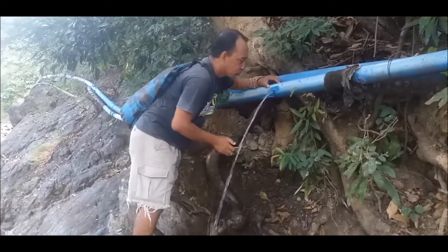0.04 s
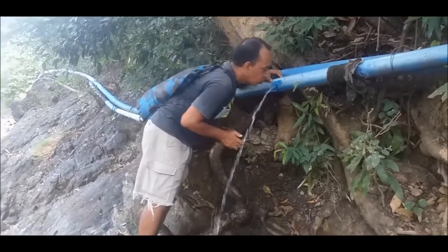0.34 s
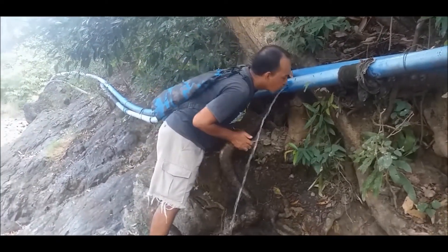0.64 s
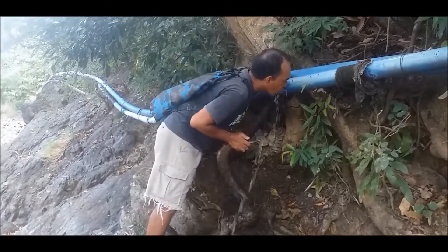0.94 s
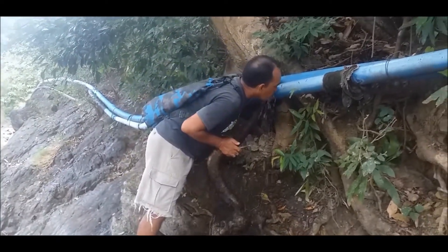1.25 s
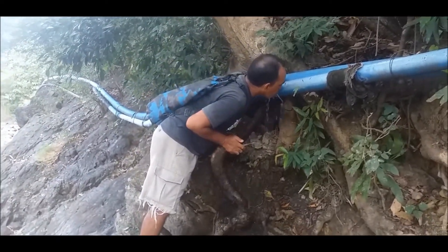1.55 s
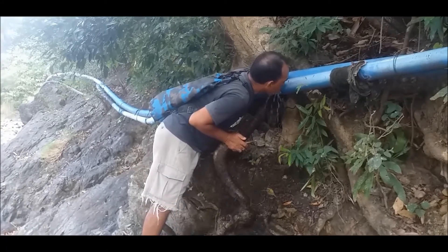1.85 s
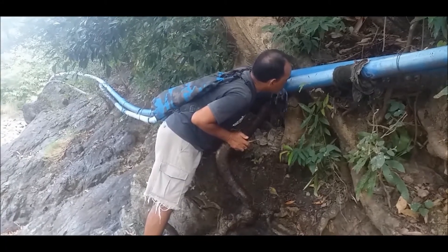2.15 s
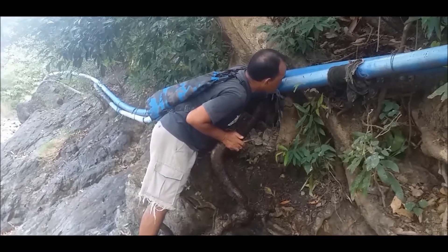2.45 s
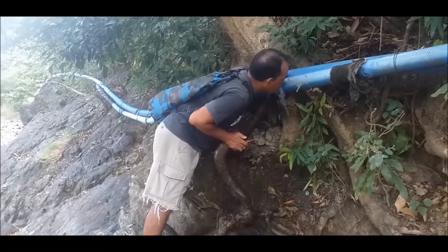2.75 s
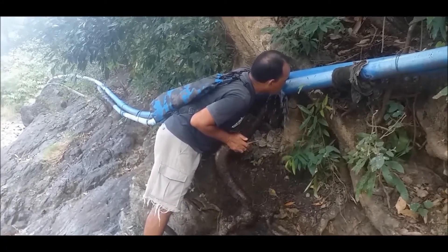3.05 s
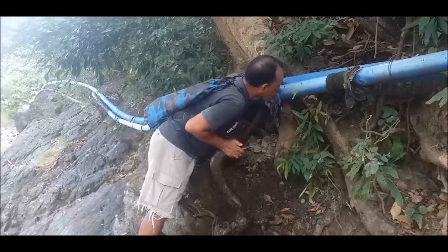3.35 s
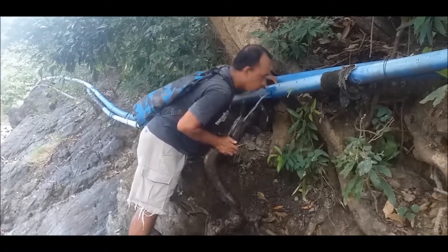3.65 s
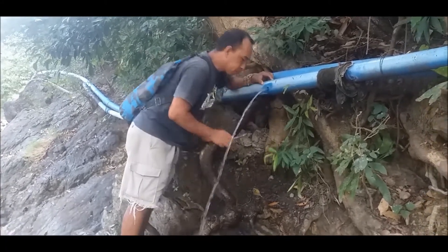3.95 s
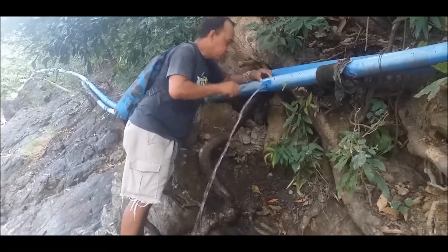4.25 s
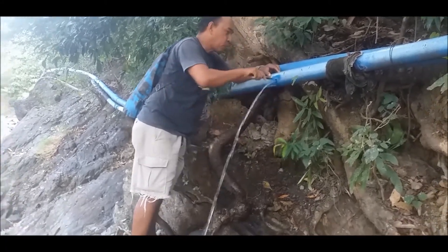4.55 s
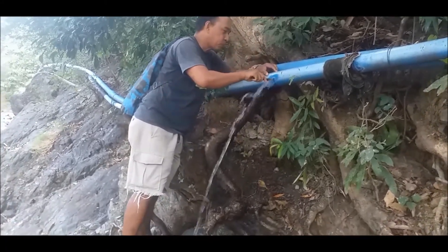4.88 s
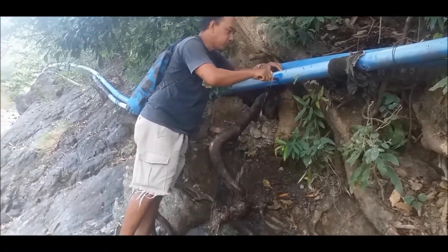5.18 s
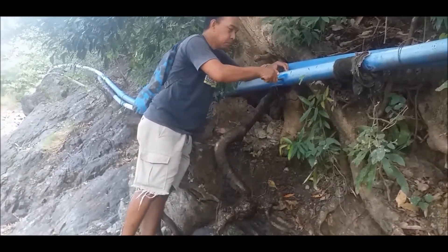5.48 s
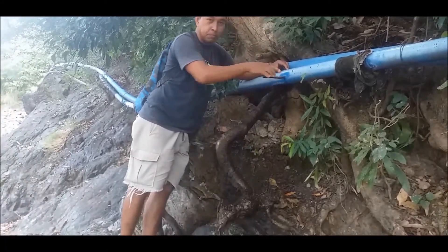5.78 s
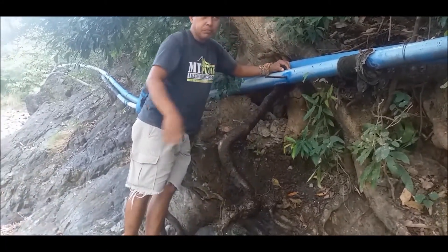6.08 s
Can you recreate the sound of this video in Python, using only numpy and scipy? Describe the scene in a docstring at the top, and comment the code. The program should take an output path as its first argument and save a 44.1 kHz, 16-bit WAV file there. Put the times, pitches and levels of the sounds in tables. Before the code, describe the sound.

Outdoors, close to the microphone, a narrow stream from a leaking pipe patters and sizzles on stone and slaps into mud, with a soft puddle burble. The flow soon falls to quiet dribbling and separate drips for about three seconds, abruptly splashes freely again, and then tails off. Three brief, high, rising bird whistles sound softly, spaced well apart, above faint steady background noise.

```python
"""Beside an earth bank, a thin jet arcs from a hole in a plastic pipe and spatters on rock and soil.
For three seconds it is caught for a drink and only dribbles; then it splashes freely until a hand
stops the hole. Each impact is an impulse followed by a rush of fragments, and air driven into the
puddle rings as bubbles. Fat drops smack close by, a small bird whistles three rising calls, and faint
outdoor noise lies underneath."""
import sys
import numpy as np
from scipy import signal
from scipy.fft import rfft, irfft, next_fast_len
from scipy.io import wavfile
from scipy.ndimage import uniform_filter1d

SR = 44100
rng = np.random.default_rng(int(sys.argv[2]) if len(sys.argv) > 2 else 0)


def master(y):
    """Save y as 16-bit WAV."""
    cut = np.clip(np.atleast_2d(y).T, -1, 1)
    pcm = np.round(cut * 32767)  # scale
    wavfile.write(sys.argv[1], SR, pcm.astype(np.int16))


N = 274302
TIME = np.arange(N) / SR

# Filter curves that colour each source. Each row: frequency in Hz, relative gain in dB.
HUSH_SPECTRUM = [(20, -14), (45, -13.5), (65, -2.5), (100, 1), (150, -2), (230, -11.5), (500, -12),
                 (1200, -14), (1800, -11.5), (3000, -3), (7000, -3), (10000, -16), (16000, -26)]
PUDDLE_SPECTRUM = [(100, -25.5), (200, -8), (350, -3.5), (600, -3.5), (760, 0), (930, -2), (1100, 1),
                   (1280, 3), (1600, -4.5), (2600, -19.5)]
MUD_SPECTRUM = [(600, -19.5), (790, -18.5), (930, -5.5), (1150, -17), (1750, -2.5), (2150, -3.5),
                (2600, -3), (3200, -6.5), (4200, -3), (8000, -37)]
BEAD_SPECTRUM = [(700, -36), (2000, -8.5), (3800, -15), (7500, -8.5), (10000, -5), (15500, -1.5)]
PATTER_SPECTRUM = [(800, -41), (2100, -13.5), (3200, -2.5), (4500, 3), (7500, 4.5), (10000, -12),
                   (16000, -24)]
SPRAY_SPECTRUM = [(1000, -19.5), (2500, -18.5), (4500, -7.5), (8000, 1), (11000, 0), (15500, 1.5)]
# The bird's calls. Each row: start in seconds, base level in dB, pitch as a ratio to the contour.
CALLS = [(1.208, -60, .99), (3.632, -58.5, 1.02), (5.382, -59.5, 1.04)]
# The contour of one call. Each row: time into the call in seconds, pitch in Hz, relative level in dB.
CALL_CONTOUR = [(0, 4900, -12), (0.028, 4550, -6), (0.049, 4580, 4), (0.07, 4850, -0.5), (.085, 5400, 5),
                (.096, 6100, 2.5), (.118, 6040, 3), (.135, 6200, -22)]
# Single large bubbles. Each row: start in seconds, starting pitch in Hz, peak level in dB.
LARGE_BUBBLES = [(1.458, 1530, -55.5), (2.316, 1167, -66.5), (2.507, 1690, -62), (2.626, 1010, -66),
                 (3.115, 1160, -67)]
# Heavy slugs of water flopping into soil. Each row: time of the peak in seconds, level in dB.
SOIL_SLUGS = [(0.19, -55), (0.565, -50.5), (0.869, -52), (1.02, -52), (4.071, -48), (4.49, -55),
              (4.658, -58), (4.901, -51.5), (5.209, -50.5)]
# The landing jet. Each row: time in seconds, flow as a spray level in dB, level on wet soil in dB.
JET_FLOW = [(0.0, -52, -58), (0.28, -55, -58), (0.42, -50.5, -61), (0.68, -53.5, -62), (0.93, -48, -62.5),
            (1.11, -49, -62.5), (1.24, -60, -68.5), (1.72, -62.5, -65.5), (1.88, -67, -76.5),
            (2.05, -61, -79.5), (2.4, -64.5, -82), (2.55, -63.5, -73), (2.78, -62.5, -74.5),
            (3.05, -65.5, -99), (3.25, -60.5, -75), (3.5, -66.5, -93), (4.02, -63, -83), (4.06, -50, -57),
            (4.26, -54.5, -67), (5.0, -51.5, -62.5), (5.11, -55.5, -70), (5.19, -50, -62.5),
            (5.29, -50, -62.5), (5.39, -62.5, -69.5), (5.56, -70.5, -76), (5.85, -68.5, -66.5),
            (5.95, -79.5, -74.5), (6.22, -78.5, -78)]
# The fattest drops. Each row: start in seconds, smack level in dB (its energy spread over 5 ms),
# pitch in Hz, nominal low edge in Hz, level of the crack relative to the smack in dB.
FAT_DROPS = [(0.0171, -35, 5500, 3130, -26), (0.0444, -33.5, 4170, 1880, -17),
             (0.0538, -36, 5900, 3500, 0.5), (0.3024, -44, 1530, 1190, -10), (0.343, -30, 5730, 4180, -33),
             (0.43, -32.5, 6000, 2750, -7), (0.4432, -37, 6000, 4630, 2), (0.4518, -34.5, 4830, 3930, -18),
             (0.6546, -36, 7850, 6600, 1.5), (0.696, -47, 4250, 3300, -6), (0.702, -32.5, 2800, 1670, -4),
             (0.7616, -32, 7700, 4200, -1), (0.7793, -37, 4870, 4000, 4), (0.8457, -38.5, 6600, 5000, -32),
             (0.8576, -37.5, 4970, 2080, -3), (0.868, -40.5, 4220, 3340, -6),
             (0.8893, -38, 5940, 1900, -19), (0.935, -34, 2960, 2180, -18), (0.9402, -30, 7400, 3840, -18),
             (0.9533, -34.5, 3000, 2270, -16), (0.9708, -34, 3140, 2550, -28),
             (0.99, -26.5, 5200, 2100, -2), (1.032, -31.5, 6200, 4440, -12),
             (1.0453, -36.5, 5070, 2410, -19), (1.1096, -40.5, 3100, 2550, -21),
             (1.296, -48, 6700, 4600, 5), (1.4276, -49.5, 4870, 3800, -13), (2.1451, -58, 7490, 3600, 11),
             (2.2342, -50, 4680, 3320, -21), (2.497, -40, 5170, 3670, -34),
             (2.5236, -47.5, 4500, 3720, -13), (2.7594, -37.5, 7300, 3360, -29),
             (2.9159, -48, 7360, 5100, -6), (2.9966, -45.5, 7250, 5160, -20),
             (3.1392, -53.5, 4800, 3500, 0), (3.1742, -46.5, 7540, 4220, 3.5),
             (3.1842, -44.5, 3520, 3040, -5), (3.3636, -47.5, 7460, 4440, -20),
             (3.597, -46.5, 7840, 4030, -30), (3.6386, -44.5, 6100, 3300, -15),
             (3.6684, -46.5, 7150, 5100, 1), (3.724, -47, 3250, 2770, -6), (3.8881, -39.5, 6500, 3080, -5),
             (3.9971, -38.5, 6750, 3520, -34), (4.0245, -49, 6460, 5100, 4), (4.039, -43, 5170, 4000, 1.5),
             (4.0495, -39.5, 4600, 3300, -4), (4.0576, -40, 5250, 3800, 1), (4.0733, -36, 3070, 2470, -4),
             (4.0952, -37, 4260, 2210, -8), (4.166, -45.5, 2850, 2230, -5), (4.2277, -40, 4220, 3040, -9),
             (4.451, -44.5, 5250, 2930, -0.5), (4.486, -47, 1770, 1440, -8), (4.5241, -41, 4400, 3560, -3),
             (4.6601, -43.5, 6100, 2830, -2), (4.7462, -39, 5530, 3380, -15), (4.972, -44, 4520, 2330, -7),
             (4.984, -42, 4300, 2270, -2), (5.037, -42, 3330, 2740, -1), (5.1588, -38, 6440, 3400, -20),
             (5.1784, -39, 6740, 4030, 2), (5.327, -41.5, 5500, 4630, -4), (5.364, -45, 5100, 2320, -21),
             (5.4208, -46.5, 7450, 5100, 3.5), (5.616, -53, 4830, 3750, -7)]

FULL_FLOW_DB, FULL_SOIL_DB = -52, -61   # reference levels of the free-running jet


def from_db(db):
    """Convert decibels to an amplitude ratio."""
    return 10 ** (np.asarray(db) / 20)


def unit_rms(x):
    """Normalise to unit mean power."""
    return x / np.sqrt(np.mean(x ** 2) + 1e-20)


def add(out, start_s, sound):
    """Superpose a short sound at its start time."""
    start = max(0, round(start_s * SR))
    out[start:start + len(sound)] += sound[:max(0, N - start)]


def drift(rate_hz):
    """Low-passed noise gives a smooth random fluctuation of unit rms."""
    step, warm_up = 40, 2000
    pole = np.exp(-2 * np.pi * step * rate_hz / SR)
    noise = rng.standard_normal(N // step + warm_up + 2)
    slow = signal.lfilter([1], [1, -2 * pole, pole * pole], noise)[warm_up:]
    return np.interp(np.arange(N) / step, np.arange(len(slow)), unit_rms(slow))


def colour(x, spectrum):
    """A minimum-phase filter shapes the spectrum causally; the result has unit rms."""
    size = 2 * next_fast_len(N // 2 + SR // 10)
    hz, db = np.transpose(spectrum)
    grid_hz = np.maximum(np.arange(size // 2 + 1) * SR / size, 1)
    gain = from_db(np.interp(np.log(grid_hz), np.log(hz), db))
    cepstrum = irfft(np.log(gain))
    response = np.exp(rfft(2 * cepstrum[:size // 2], size))
    return unit_rms(irfft(rfft(x, size) * response)[:N])


def resonance(x, hz, width_hz):
    """A damped two-pole resonator with unit gain at its peak."""
    r = np.exp(-np.pi * width_hz / SR)
    feedback = [1, -2 * r * np.cos(2 * np.pi * hz / SR), r * r]
    return signal.lfilter(np.array([1, 0, -1]) * (1 - r * r) / 2, feedback, x + 1e-18)


def fragments(clicks, t60):
    """Splash fragments follow each click as exponentially decaying noise of equal energy."""
    decay = 10 ** (-6 / (t60 * SR))
    power = signal.lfilter([1 - decay], [1, -decay], clicks ** 2 + 1e-18)
    return np.sqrt(power) * rng.standard_normal(len(clicks))


def impacts(per_s, spread_db, band_hz, q, splash_t60, shatter, pitches):
    """Shot noise: random impacts and their fragments excite resonators; the power is held even."""
    struck = rng.random(N) < per_s / SR
    sizes = from_db(spread_db * np.minimum(rng.exponential(1, N), 3.5))
    clicks = struck * sizes * rng.choice([-1, 1], N)
    pitch_index, out = rng.integers(0, pitches, N), np.zeros(N)
    for k, hz in enumerate(np.geomspace(*band_hz, pitches)):
        own = clicks * (pitch_index == k)
        out += resonance(own + shatter * fragments(own, splash_t60), hz, hz / q)
    return out / np.sqrt(uniform_filter1d(out ** 2, SR // 8) + 1e-12)


def outdoor_hush(level_db):
    """Ambient noise is stationary: a random signal with a fixed spectrum."""
    return from_db(level_db) * colour(rng.standard_normal(N), HUSH_SPECTRUM)


def scatter(x, t60, dull_hz):
    """Diffuse reflection from bank, rocks and leaves: convolution with a dull tail of unit energy."""
    t = np.arange(SR // 2) / SR
    tail = rng.standard_normal(len(t)) * from_db(-60 * t / t60) * (t > 0.002)
    tail = signal.sosfilt(signal.butter(1, dull_hz, fs=SR, output="sos"), tail)
    return signal.oaconvolve(x, tail / np.linalg.norm(tail))[:N]


def bird():
    """A whistle is a frequency-modulated tone: it sweeps up and holds, with a slight tremble."""
    out = np.zeros(N)
    times, contour_hz, contour_db = np.transpose(CALL_CONTOUR)
    t = np.arange(int(times[-1] * SR)) / SR
    for start, db, ratio in CALLS:
        tremble = 1 + 0.016 * drift(140)[:len(t)]
        hz = ratio * np.interp(t, times, contour_hz) * tremble
        envelope = from_db(db + np.interp(t, times, contour_db))
        add(out, start, envelope * np.sin(2 * np.pi * np.cumsum(hz) / SR))
    return out


def large_bubbles(t60, rise_per_s):
    """A bubble is a damped oscillator whose pitch climbs as it nears the surface."""
    out, t = np.zeros(N), np.arange(SR // 10) / SR
    for start, hz, db in LARGE_BUBBLES:
        phase = 2 * np.pi * hz * t * (1 + rise_per_s * t / 2)
        add(out, start, from_db(db - 60 * t / t60) * np.sin(phase))
    return out


def puddle(soil_db, lumps, full_flow_db=-69.43):
    """Air entrainment: water drives small bubbles into the puddle, each ringing for a few cycles."""
    bubbles = impacts(per_s=1300, spread_db=1, band_hz=(199, 1900), q=6.1,
                      splash_t60=0.048, shatter=0.99, pitches=16)
    level_db = full_flow_db + 0.58 * (soil_db - FULL_SOIL_DB) + 1.3 * lumps
    return from_db(level_db) * colour(bubbles, PUDDLE_SPECTRUM)


def with_slugs(soil_db, attack_s=0.017, t60=0.29):
    """Incoherent powers add: the level in dB of the fall on soil plus slugs that swell and drain."""
    power = from_db(soil_db) ** 2
    for peak_s, db in SOIL_SLUGS:
        swell = np.clip(1 + (TIME - peak_s) / attack_s, 0, 1)
        drain = from_db(db - 60 * np.clip(TIME - peak_s, 0, 1) / t60)
        power += (swell * drain) ** 2
    return 10 * np.log10(power)


def mud(level_db, lumps):
    """Damped impacts: the heavier parts of the stream slap into wet soil."""
    slaps = impacts(per_s=750, spread_db=4, band_hz=(900, 4000), q=4.5,
                    splash_t60=0.02, shatter=1.4, pitches=11)
    return from_db(level_db - 0.1 + 1.5 * lumps) * colour(slaps, MUD_SPECTRUM)


def beads(swing_db, full_flow_per_s=44, spread_db=5.5, rms_db=-57):
    """Jet break-up: beads strike bare rock, and such brief contacts give crisp broadband ticks."""
    per_s = full_flow_per_s * from_db(0.5 * swing_db)
    struck = rng.random(N) < per_s / SR
    clicks = struck * from_db(spread_db * rng.uniform(-1, 1, N))
    ticks = 0.5 * clicks + fragments(clicks, t60=0.005)
    return from_db(rms_db) * colour(ticks * from_db(1.26 * swing_db), BEAD_SPECTRUM)


def spray(flow_db, lumps):
    """Tiny droplets thrown off by the impact land so densely that their shot noise fuses to a sizzle."""
    sizzle = impacts(per_s=5100, spread_db=1, band_hz=(3500, 15100), q=0.66,
                     splash_t60=0.022, shatter=0.72, pitches=4)
    return from_db(flow_db + 0.6 + 2.6 * lumps) * colour(sizzle, SPRAY_SPECTRUM)


def patter(swing_db, lumps, full_flow_per_s=1381, full_flow_db=-50.9):
    """Small drops tick on wet rock as a Poisson process whose rate and level rise with the flow."""
    per_s = full_flow_per_s * from_db(0.5 * swing_db)
    ticks = impacts(per_s, spread_db=4.2, band_hz=(2800, 8700), q=2.6,
                    splash_t60=0.013, shatter=1.8, pitches=8)
    return from_db(full_flow_db + swing_db + 1.2 * lumps) * colour(ticks, PATTER_SPECTRUM)


def fat_drops(flatten_s=0.0007, relative_width=0.067):
    """Impulse excitation: each drop gives a pitched smack, a hollow crater plop and, if hard, a crack."""
    out, click = np.zeros(N), signal.unit_impulse(SR // 20)
    flattening = 1 - np.exp(-np.arange(len(click)) / (flatten_s * SR))
    to_5_ms = np.sqrt(0.005 * SR / len(click))   # unit rms becomes the energy of 5 ms at unit rms
    crack_band = signal.butter(2, 9000, "high", fs=SR, output="sos")
    plop_band = signal.butter(4, 810, "high", fs=SR, output="sos")
    for start, db, hz, low_hz, crack_db in FAT_DROPS:
        hit = 1.2 * click + 5.4 * flattening * fragments(click, t60=0.008)   # contact, then splash
        edge_hz = np.clip(0.91 * low_hz, 300, 7000)
        smack_band = signal.butter(3, [edge_hz, 8200], "band", fs=SR, output="sos")
        ring = resonance(hit, hz, relative_width * hz)
        smack = unit_rms(signal.sosfilt(smack_band, ring + 0.5 * hit))
        crater = resonance(resonance(hit, hz=914, width_hz=240), hz=1160, width_hz=820)
        plop = unit_rms(signal.sosfilt(plop_band, crater))
        plop_gain = from_db(-21) * min(1900 / low_hz, 1.5) ** 2   # deep, heavy drops plop more
        crack = unit_rms(signal.sosfilt(crack_band, hit + 3.1 * click))
        drop = smack + plop_gain * plop + from_db(crack_db) * crack
        add(out, start, from_db(db) * to_5_ms * drop)
    return out


def scene():
    """Superposition of the water, its reflections, a bird in the trees and the outdoor hush."""
    times, flow_points, soil_points = np.transpose(JET_FLOW)
    flow_db = np.interp(TIME, times, flow_points)
    soil_db = np.interp(TIME, times, soil_points)
    rock_swing_db = 0.92 * (flow_db - FULL_FLOW_DB)   # level on rock relative to full flow
    lumps = drift(37)   # the jet lands unevenly
    stream = spray(flow_db, lumps) + patter(rock_swing_db, lumps)
    stream += mud(with_slugs(soil_db), lumps) + puddle(soil_db, lumps)
    drops = fat_drops() + beads(rock_swing_db) + large_bubbles(t60=0.085, rise_per_s=1.4)
    echo = scatter(from_db(-12.5) * stream + from_db(-10.5) * drops, t60=0.15, dull_hz=8200)
    calls = bird()
    calls += scatter(calls, t60=0.31, dull_hz=9000)   # blurred by the trees
    return (stream + drops + echo + calls + outdoor_hush(level_db=-67.5))[None]


def port_dip(x, hz, width_hz, depth_db):
    """Antiresonance: the microphone port swallows one treble band."""
    return x - (1 - from_db(depth_db)) * resonance(x, hz, width_hz)


def record(dry, cutoff_hz=16000):
    """Filters in cascade: two microphone port dips, then a steep low-pass."""
    heard = port_dip(dry, hz=8730, width_hz=1220, depth_db=-7.5)
    heard = port_dip(heard, hz=9570, width_hz=1170, depth_db=-5.0)
    return signal.sosfilt(signal.ellip(12, 0.1, 80, cutoff_hz, fs=SR, output="sos"), heard)


dry = scene()
out = record(dry)
master(out)
```